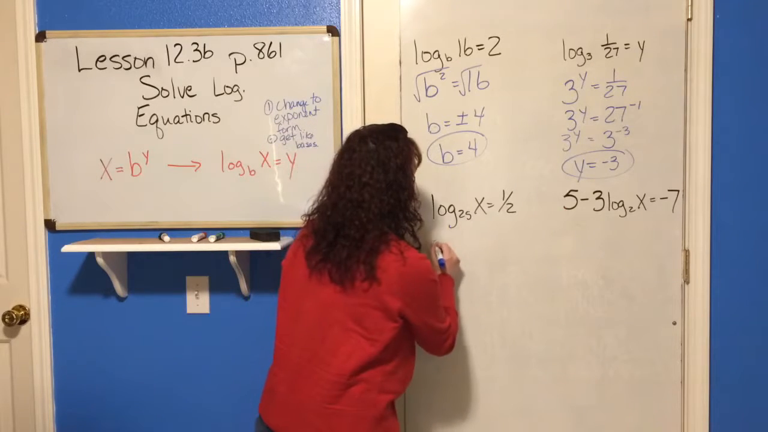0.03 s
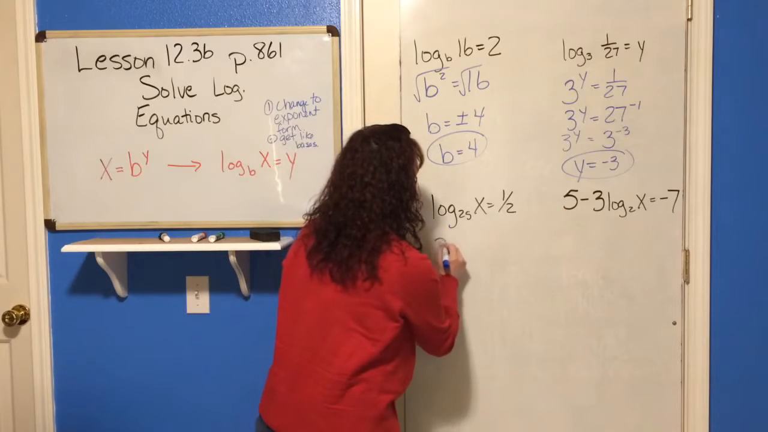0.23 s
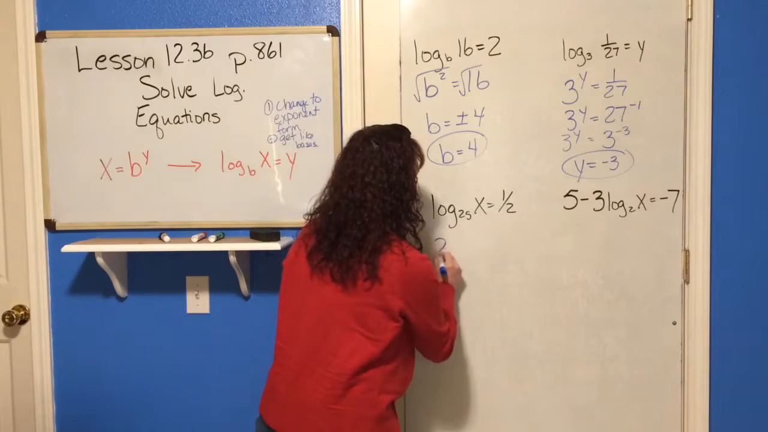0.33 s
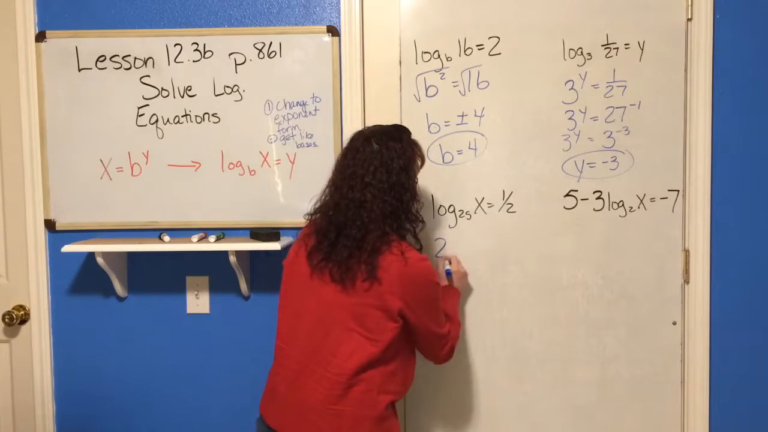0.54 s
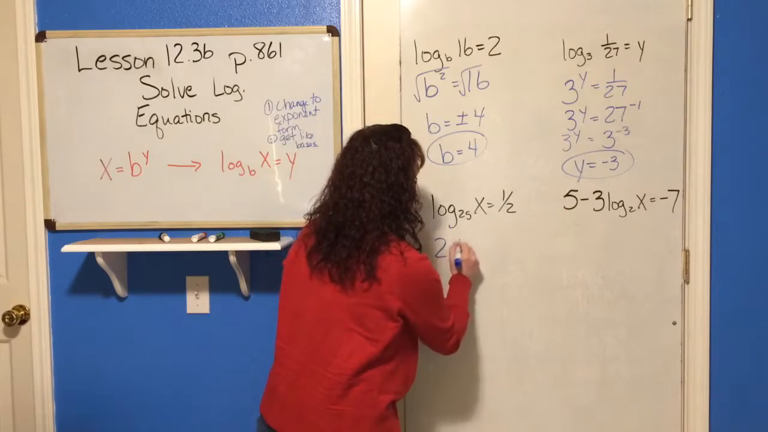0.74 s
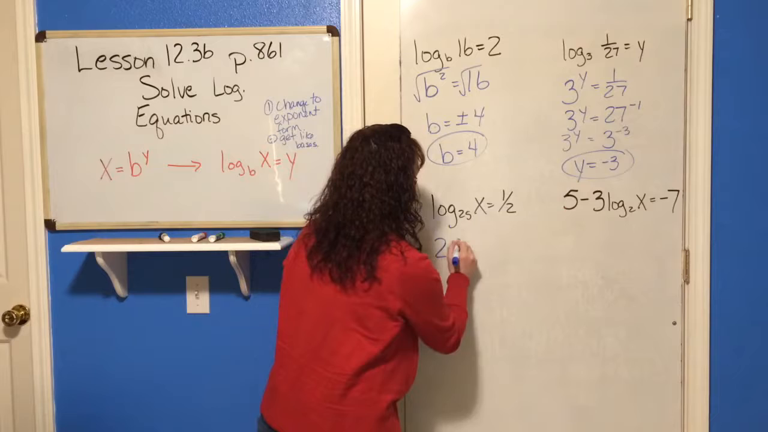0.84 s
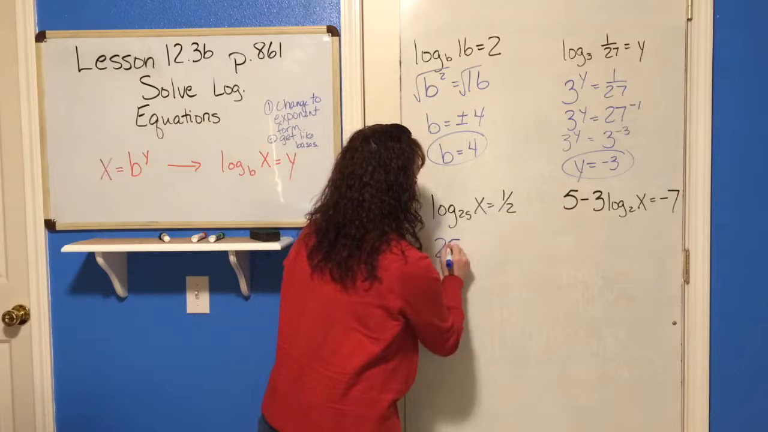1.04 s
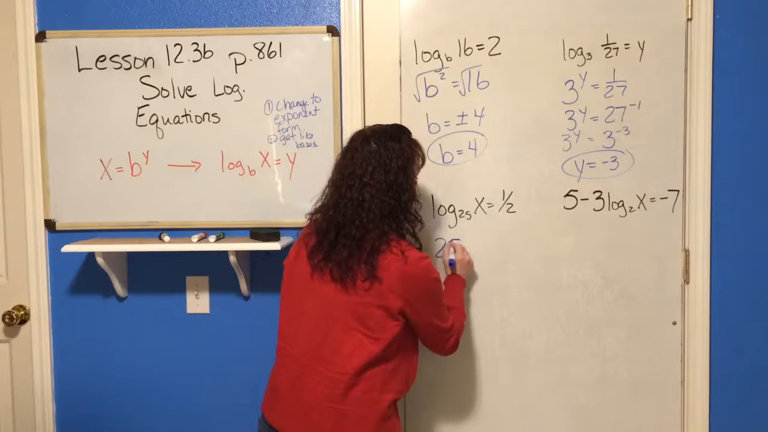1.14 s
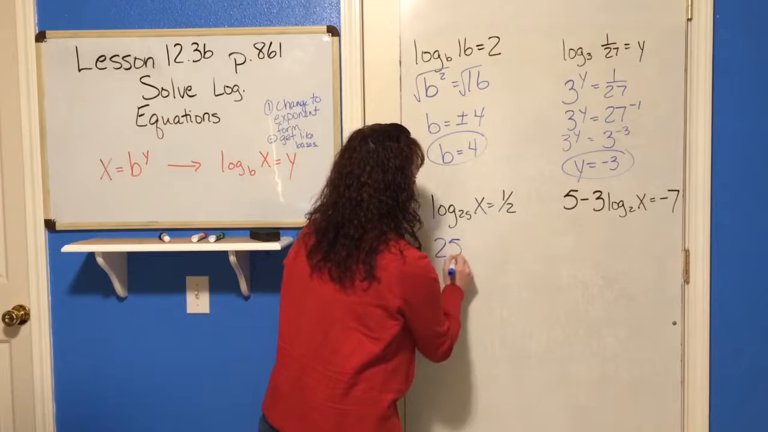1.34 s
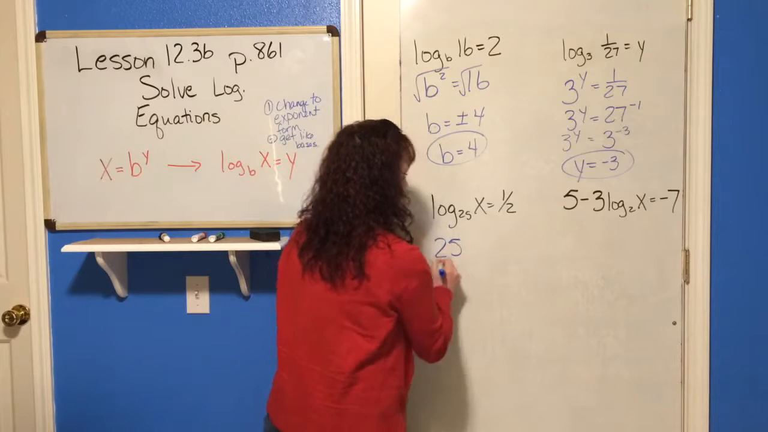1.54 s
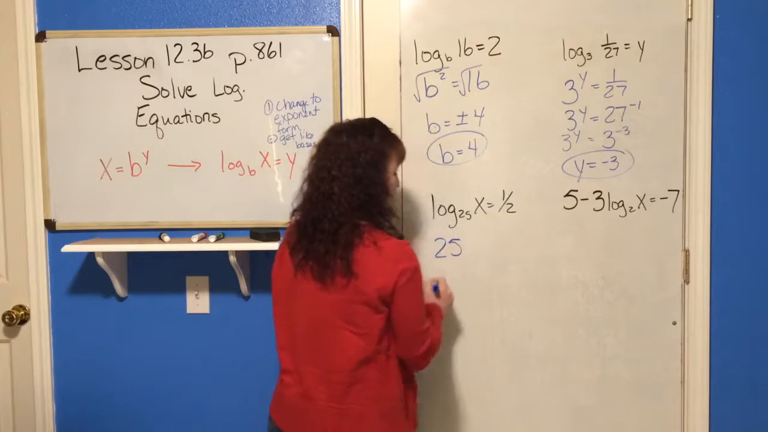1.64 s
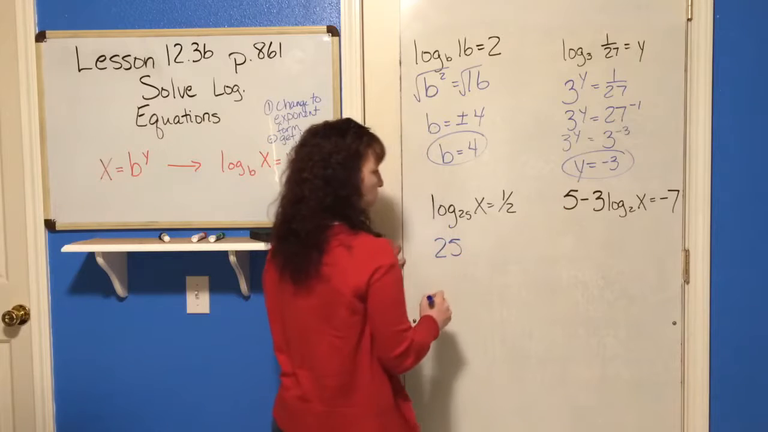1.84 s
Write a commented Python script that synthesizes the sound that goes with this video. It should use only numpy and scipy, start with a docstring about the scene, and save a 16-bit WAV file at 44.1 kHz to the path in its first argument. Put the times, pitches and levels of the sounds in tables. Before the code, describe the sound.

Dry-erase marker lands with a low thump and slides softly, pauses, lands again and rubs on, clicks hard, then judders through a last stroke and ends with tiny clicks, over low room rumble and microphone hiss.

```python
"""Felt-tip marker on a whiteboard

Quiet small room, thin wall-hung whiteboard: a felt-tip marker writes two digits.
Soft contacts knock and judder, ringing the panel's modes with a dull room tail behind them.
Shaped noise hisses along each stroke and rumbles through the panel; narrow noise sings at the nib's
resonances. Short ringing modes give the second landing a faint bright edge, then clicks of plastic,
one of them hard. Below lie soft room rumble and microphone hiss."""
import sys
import numpy as np
from scipy import signal
from scipy.io import wavfile

SR = 44100
rng = np.random.default_rng(int(sys.argv[2]) if len(sys.argv) > 2 else 0)


def amplitude_ratio(level_db):
    """Convert a level in decibels to the matching linear amplitude (field) ratio."""
    exponent = np.asarray(level_db, float) / 20
    return 10 ** exponent


def wav_record(signal):
    """Record a signal, one row per channel, as 16-bit PCM in the file named by sys.argv[1]."""
    frames = np.transpose(np.atleast_2d(signal))
    bounded = np.clip(frames, -1, 1)
    # unit amplitude maps onto the largest positive 16-bit level
    quanta = np.round(bounded * 32767).astype(np.int16)
    wavfile.write(sys.argv[1], SR, quanta)


N = 83790


def rms_one(x):
    """Scale a signal to rms 1."""
    return x / np.sqrt(np.mean(x ** 2) + 1e-20)


def drift(rate_hz):
    """Slow random wander of rms 1: noise through two equal poles at rate_hz, drawn every 40 samples."""
    pole = np.exp(-80 * np.pi * rate_hz / SR)
    noise = rng.standard_normal(N // 40 + 2002)
    slow = signal.lfilter([1], [1, -2 * pole, pole * pole], noise)[2000:]  # settled part
    return np.interp(np.arange(N) / 40, np.arange(len(slow)), rms_one(slow))


def ring(x, hz, t60_s):
    """A damped resonance: a unit click sets a sine of starting height 1 ringing."""
    radius = amplitude_ratio(-60 / (t60_s * SR))
    angle = 2 * np.pi * hz / SR
    return signal.lfilter([0, np.sin(angle)], [1, -2 * radius * np.cos(angle), radius * radius], x + 1e-18)


def bands(spectrum, patchy_db, tilt_db=0, tilt_hz=4060):
    """Narrow noise bands with partly shared flicker; rms 1 before flicker and tilt (dB per octave)."""
    out, power = 0, 0
    edges = np.geomspace(22, 16500, 34)
    white = rng.standard_normal((2, N + SR // 2))  # neighbouring bands use different noise
    hz, db = np.transpose(spectrum)
    together = drift(1.7)
    for k, (low, high) in enumerate(zip(edges, edges[1:])):
        bandpass = signal.butter(2, [low, high], "band", fs=SR, output="sos")
        band = signal.sosfilt(bandpass, white[k % 2])[-N:]
        mid = np.sqrt(low * high)
        band = band * amplitude_ratio(np.interp(np.log(mid), np.log(hz), db))
        power += np.mean(band ** 2)
        flicker_db = patchy_db * (0.6 * together + drift(12.5))
        out = out + band * amplitude_ratio(flicker_db + tilt_db * np.log2(mid / tilt_hz))
    return out / np.sqrt(power)


# room rumble and microphone hiss, relative density: (f/Hz, level/dB per Hz)
AIR_SPECTRUM = [(25, -14), (49, 11.5), (163, 2), (504, -16), (677, -23.5), (960, -32), (1190, -18),
                (1930, -31.5), (3300, -23.5), (3770, -29), (11900, -27.5), (13300, -29), (15200, -36)]
AIR_DB, AIR_PATCHY_DB, AIR_CUT_HZ = -63.5, 0.5, 106  # level is set before the low cut


def room_air():
    """Steady broadband noise shaped like a quiet room and microphone, its lowest bass thinned."""
    low_cut = signal.butter(2, AIR_CUT_HZ, "high", fs=SR)
    return amplitude_ratio(AIR_DB) * signal.lfilter(*low_cut, bands(AIR_SPECTRUM, AIR_PATCHY_DB))


# resonances and valleys that colour all felt hiss: (f/Hz, width/Hz, level/dB gain)
BARREL_COLOUR = [(1010, 30, 5), (1220, 80, 5), (2470, 120, 4), (3920, 250, -10), (4620, 120, 7), (5010, 200, -9),
                 (5530, 250, 5), (6400, 350, -7), (7250, 250, 4), (8350, 700, -10), (9950, 100, 5), (11600, 200, 4),
                 (13000, 600, -8)]


def barrel_colour(x):
    """Lifts the marker barrel's resonances and sinks the valleys between them."""
    for hz, width_hz, gain_db in BARREL_COLOUR:
        radius = np.exp(-np.pi * width_hz / SR)
        top = np.array([1, 0, -1]) * (1 - radius * radius) / 2
        bottom = [1, -2 * radius * np.cos(2 * np.pi * hz / SR), radius * radius]
        x = x + (amplitude_ratio(gain_db) - 1) * signal.lfilter(top, bottom, x)
    return x


# modes of the hung panel, rung by knocks and by rubbing: (f/Hz, level/dB relative, t60/s for a knock)
PANEL = [(23, -25, 0.2), (50.3, -39, 0.96), (63.6, -35, 1), (78.45, -22, 0.22), (87, -30.5, 0.71),
         (142, -30, 0.31), (170.8, -27, 0.343), (218, -25, 0.23), (237.9, -25, 0.33), (277.8, -25, 0.32),
         (324.2, -15.5, 0.12), (379, -16, 0.084), (408.4, -16, 0.093), (532, -28, 0.18), (594, -28, 0.18),
         (671, -19.5, 0.039), (740, -11.5, 0.016), (992, -23, 0.063)]
RUB_DB, RUB_FOLLOWS = -66, 0.35  # level at the loudest hiss; share of the hiss's dB swing


def panel_rumble(hiss_db):
    """Sliding shakes the panel: noise drives its modes, with a third of their decay after a knock."""
    white = rng.standard_normal(N)
    modes = sum(amplitude_ratio(mode_db) * ring(white, hz, t60_s * 0.33) for hz, mode_db, t60_s in PANEL)
    level_db = RUB_DB + RUB_FOLLOWS * hiss_db + 0.97 * drift(22.0)
    return amplitude_ratio(level_db) * rms_one(modes)


# felt sliding on the panel, one list per stroke and its aftermath: # (t/s, level/dB of hiss before barrel
# colour, brightness/dB per octave)
STROKES = [
    [(.225, -70, -7), (.26, -64.5, -2), (.33, -63.5, -2.5), (.365, -65.5, -1), (.40, -70, -1),
     (.44, -64.5, -0.5), (.47, -62.5, 0.9), (.53, -62.5, -1), (.548, -69.5, -6.5), (.565, -67, -3),
     (.59, -60.5, 1), (.645, -63.5, 0), (.675, -69, -3), (.69, -79, -2)],
    [(.82, -80, -3.5), (.86, -73.5, -1), (.89, -80.5, -1), (.93, -77.5, -7), (.96, -66.5, -2.5),
     (1.02, -63.5, 1), (1.06, -66.5, -1), (1.1, -68, -2.5), (1.17, -67, -2.5), (1.19, -71, -4),
     (1.215, -99.5, -15)],
    [(1.232, -62.5, -4), (1.26, -61, -0.5), (1.30, -61.5, 2.5), (1.37, -64.5, -1.5), (1.422, -65.5, 1),
     (1.46, -63, -.5), (1.50, -62.5, -.5), (1.535, -65, -3), (1.57, -66, -0.5), (1.585, -73.5, 1),
     (1.65, -70.5, 0.5), (1.75, -69.5, -1), (1.9, -74, -1.5)],
]
# relative density of the felt hiss: (f/Hz, level/dB per Hz)
FELT = [(290, -79), (500, -7.5), (1180, -3), (1790, -1.5), (2450, -5), (3600, -4.5), (5200, -8),
        (7200, -5.5), (10400, -6), (12800, -6), (15300, -8)]
LIFTED_DB, LIFT_S = -79.5, 0.012  # hiss level between strokes; time to reach it
PATCHY_DB, GRAIN_DB = 2, 0.5  # flicker of the bands; fast grain of the whole hiss


def strokes():
    """Felt friction: grainy hiss follows each stroke's level and brightness and rumbles in the panel."""
    rows = []
    for stroke in STROKES:
        before = (stroke[0][0] - LIFT_S, LIFTED_DB, 0)
        after = (stroke[-1][0] + LIFT_S, LIFTED_DB, 0)
        rows += [before, *stroke, after]
    s, db, tilt = np.transpose(rows)
    t = np.arange(N) / SR
    level_db = np.interp(t, s, db)
    felt = barrel_colour(bands(FELT, PATCHY_DB, np.interp(t, s, tilt)))
    hiss = amplitude_ratio(level_db + GRAIN_DB * drift(86.0)) * felt
    return hiss + panel_rumble(level_db - db.max())


# the tip lands on or judders against the panel:
# (t/s, level/dB of the whole knock, contact/s, level/dB added to the boom modes)
KNOCKS = [(0.2232, -19.5, 0.0041, 2.5), (0.4823, -47.5, 0.0053, 7), (0.5067, -49, 0.0095, -2),
          (0.5465, -54.5, 0.013, 5), (0.5678, -46, 0.0047, 10), (.826, -50.5, 0.0072, -2),
          (0.9104, -21.5, 0.0043, 7), (1.2325, -49.5, 0.0097, 11.5), (1.3282, -52, 0.0056, 4),
          (1.365, -51, 0.0065, 1), (1.3895, -48, .005, 3), (1.4102, -46.5, 0.0095, 6),
          (1.438, -47, 0.0051, 6), (1.517, -49, 0.0059, 14.5)]
# the two firm landings, by row of KNOCKS: (edge f/Hz, level/dB added to the upper modes)
LANDINGS = {0: (1404, 4), 6: (880, -4.5)}
SPREAD, QUICK = 0.54, 1.25  # length of the flex in contacts; it sets in faster than it springs back
LATE, JUDDER_LATE = 0.1, -0.18  # centre of the flex in contacts: a judder dips first
EDGE_DB, EDGE_T60_S = -29, 0.019  # the felt's brief brighter edge on a firm landing
SPOT_DB = 3.5  # each knock lands elsewhere and weights the modes anew
BOOM_HZ, UPPER_HZ = 120, 450  # top of the boom, foot of the upper modes


def knocks():
    """The panel dips, springs and dips under each soft contact, then rings in its modes."""
    out, t = np.zeros(N), np.arange(N) / SR
    spots = rng.normal(0, SPOT_DB, (len(KNOCKS), len(PANEL)))
    for row, ((s, db, contact_s, boom_db), spot) in enumerate(zip(KNOCKS, spots)):
        i = int((s - .02) * SR)  # leave room for the first dip
        u = (t[i:i + SR] - s) / contact_s
        edge_hz, upper_db = LANDINGS.get(row, (None, 0))
        flex = np.where(u < 0, QUICK * u, u)
        centre = LATE if edge_hz else JUDDER_LATE
        sound = np.cos(2 * np.pi * flex) * np.exp(-((flex - centre) / SPREAD) ** 2)
        if edge_hz:
            touch = 1. * (np.arange(len(u)) == int(.018 * SR))  # 2 ms ahead of the knock's centre
            sound += amplitude_ratio(EDGE_DB) * ring(touch, edge_hz, EDGE_T60_S)
        push = np.exp(-(u * 9.0) ** 2) / (contact_s * SR / 4)  # short smooth push on the modes
        for k, (hz, mode_db, t60_s) in enumerate(PANEL):
            weight_db = mode_db + spot[k] + boom_db * (hz < BOOM_HZ) + upper_db * (hz > UPPER_HZ)
            sound += (-1) ** k * amplitude_ratio(weight_db) * ring(push, hz, t60_s)
        out[i:i + SR] += amplitude_ratio(db) * sound
    return out


ROOM_T60_S, ROOM_DB = 0.31, -14.5  # level of the tail for a unit click
ROOM_DELAY_S = 0.0047  # about 1.6 m of extra path
ROOM_LOW_HZ, ROOM_CUT_HZ = 200, 2600  # little bass and little treble come back


def room(x):
    """The small room answers with a dense dull tail: decaying noise convolved with the hits."""
    t = np.arange(SR // 2) / SR
    tail = rng.standard_normal(len(t)) * amplitude_ratio(-60 * t / ROOM_T60_S) * (t > ROOM_DELAY_S)
    tail = signal.lfilter(*signal.butter(1, [ROOM_LOW_HZ, ROOM_CUT_HZ], "band", fs=SR), tail)
    tail = tail / np.sqrt(np.sum(tail ** 2))
    return amplitude_ratio(ROOM_DB) * signal.fftconvolve(x, tail)[:N]


# the nib sings for a while: (t/s start, length/s, f/Hz, width/Hz, level/dB rms before the swell)
SINGS = [(.25, .15, 1250, 300, -74), (.26, .15, 11300, 1200, -71), (.265, .1, 4700, 400, -74),
         (.27, .1, 5600, 400, -76), (.43, .115, 5500, 400, -70), (.45, .09, 13800, 1500, -72),
         (.53, .06, 850, 300, -72), (.565, .11, 6950, 550, -63.5), (.575, .09, 11900, 400, -72),
         (.58, .09, 1750, 150, -76), (.95, .13, 4600, 300, -73), (.96, .12, 2650, 300, -72),
         (.99, .1, 1100, 200, -76), (.99, .19, 5550, 400, -76), (1.23, .06, 1300, 400, -69),
         (1.26, .1, 4620, 250, -72), (1.27, .17, 2460, 300, -67), (1.29, .13, 10400, 900, -62.5),
         (1.37, .09, 1250, 250, -73), (1.43, .125, 5780, 500, -64), (1.435, .11, 7430, 500, -66),
         (1.485, .1, 4100, 450, -67.5), (1.5, .08, 3400, 300, -70), (1.5, .075, 2030, 200, -68.5)]


def sings():
    """Nib resonances: noise passes twice through one resonance, swelling and fading."""
    out = np.zeros(N)
    for s, length_s, hz, width_hz, db in SINGS:
        i, n = int(s * SR), int(length_s * SR)
        tone = rng.standard_normal(SR // 4)
        t60_s = np.log(1000) / (np.pi * width_hz * 1.5)  # wider, as two passes narrow it
        for _ in range(2):
            tone = ring(tone, hz, t60_s)
        swell = np.sin(np.pi * np.arange(n) / n)
        out[i:i + n] += amplitude_ratio(db) * rms_one(tone)[-n:] * swell
    return out


# clicks of plastic, and first the faint bright edge of the second landing:
# (t/s, level/dB before a 6 dB trim, low cut f/Hz)
EDGE_AND_CLICKS = [(.9085, -59, 900), (1.2264, -31, 740), (1.587, -50.5, 4000), (1.7018, -45.5, 7000)]
# modes of the marker's barrel: (f/Hz, level/dB relative, t60/s)
BARREL = [(1500, -32, 0.025), (1882, -19.5, 0.11), (2880, -4, 0.023), (4800, -9.5, 0.0018),
          (5440, -5, 0.0017), (7330, -15.5, 0.0069), (8740, -1, 0.0012), (11300, -5.5, 0.0026),
          (14000, -11, 0.0036)]
BOUNCE_S, BOUNCE_DB, BOUNCE_CUT_HZ = 0.001, 2.5, 8000  # delay; gain over the hit; treble cut


def edge_and_clicks():
    """A hit and its softer-edged bounce of opposite sign ring short modes: landing edge, then clicks."""
    out = np.zeros(N)
    for s, db, cut_hz in EDGE_AND_CLICKS:
        hit = amplitude_ratio(db - 6) * (np.arange(N) == int(s * SR))
        later = np.roll(hit, int(BOUNCE_S * SR))
        bounce = amplitude_ratio(BOUNCE_DB) * signal.lfilter(*signal.butter(2, BOUNCE_CUT_HZ, fs=SR), later)
        rung = sum(amplitude_ratio(mode_db) * ring(bounce - hit, hz, t60_s) for hz, mode_db, t60_s in BARREL)
        out += signal.sosfilt(signal.butter(4, cut_hz, "high", fs=SR, output="sos"), rung)
    return out


def scene():
    """Room air, strokes, singing nib, and the knocks, edge and clicks with their room tail, in mono."""
    air = room_air()
    rubbing = strokes()
    hits = knocks() + edge_and_clicks()
    return (air + rubbing + hits + room(hits) + sings())[None]


def band_limit(x):
    """A steep low-pass at the top of the band."""
    return signal.sosfilt(signal.butter(12, 15750, fs=SR, output="sos"), x)


def record(dry):
    """The finished mix stops steeply above 15.3 kHz."""
    top_cut = signal.ellip(10, .5, 60, 15300, fs=SR, output="sos")
    mix = signal.sosfilt(top_cut, dry)
    return band_limit(mix)


dry = scene()
out = record(dry)
wav_record(out)
```